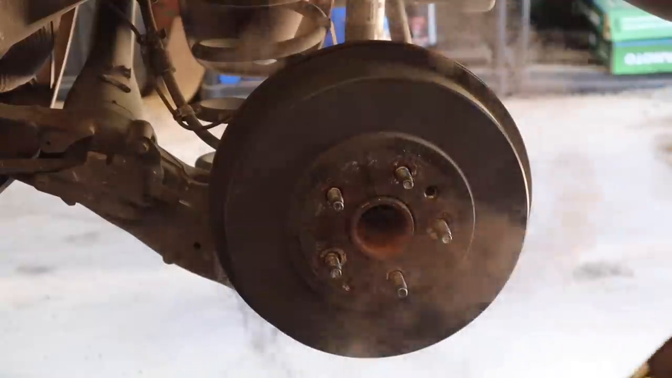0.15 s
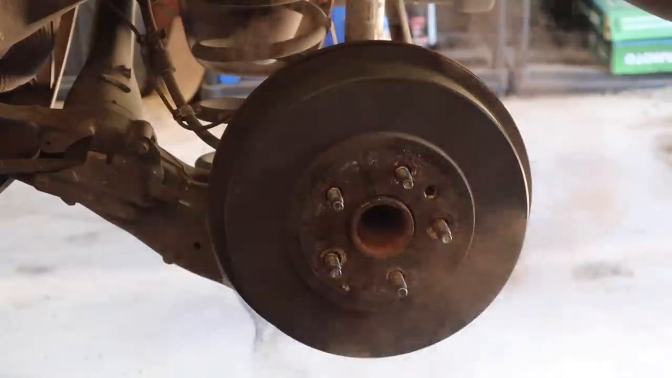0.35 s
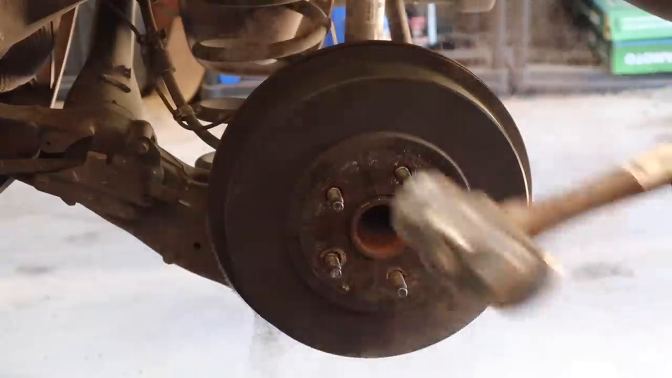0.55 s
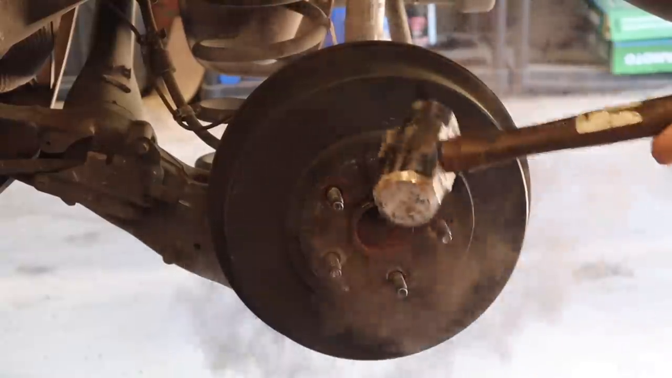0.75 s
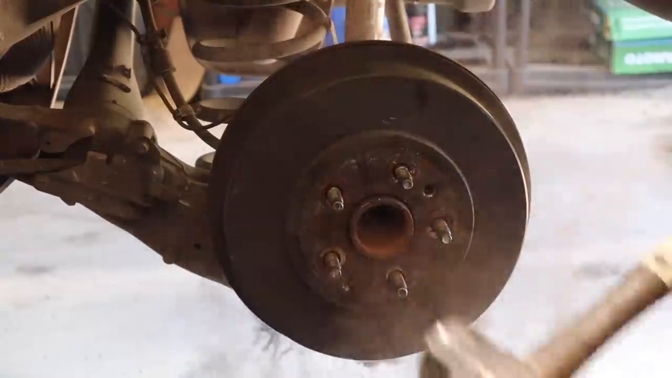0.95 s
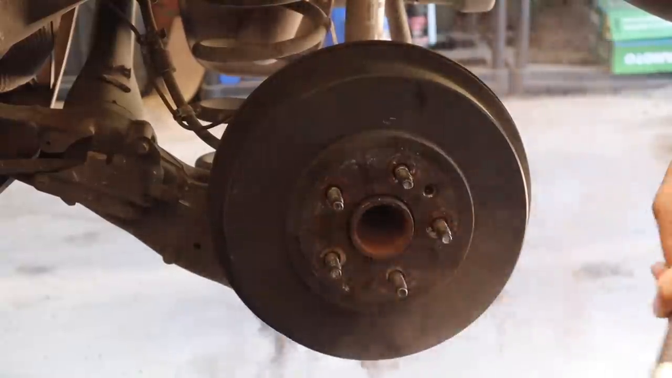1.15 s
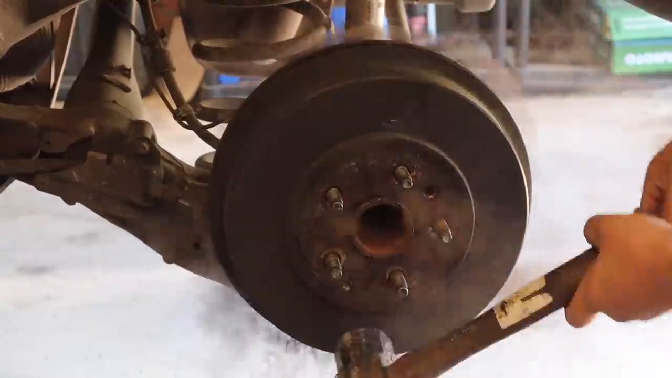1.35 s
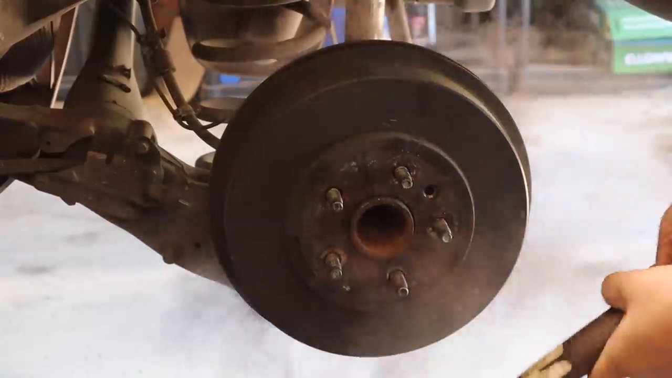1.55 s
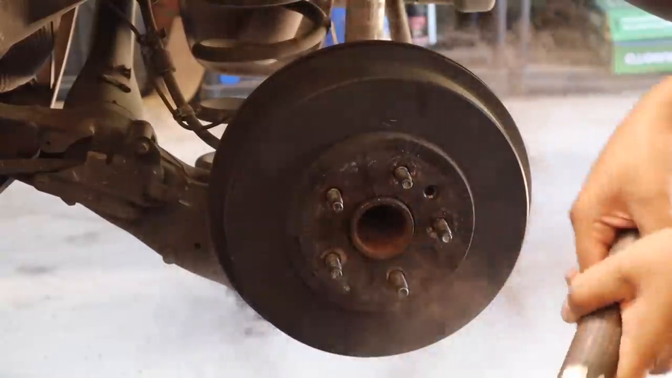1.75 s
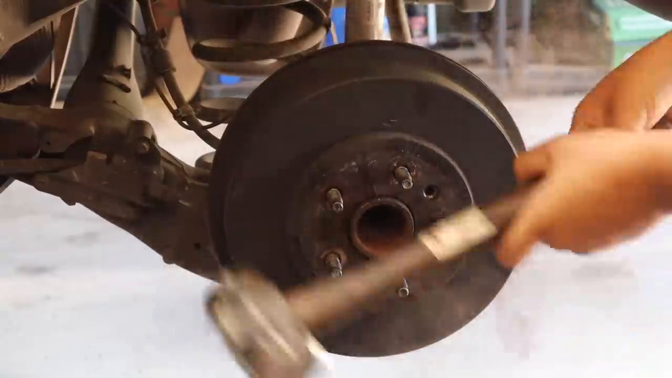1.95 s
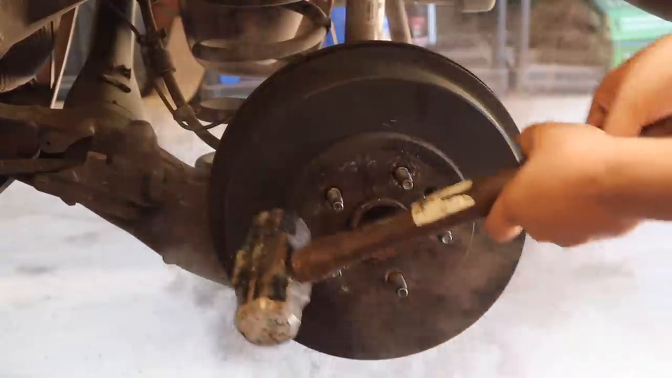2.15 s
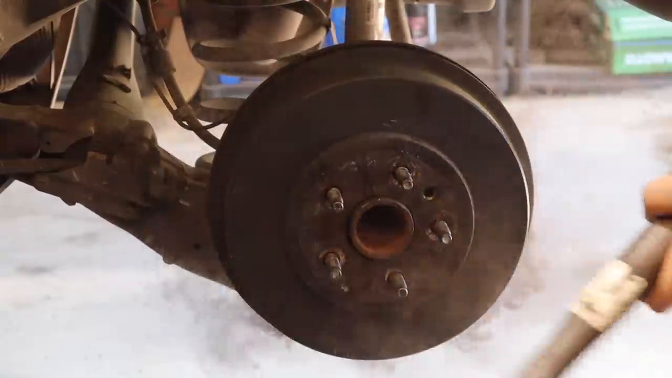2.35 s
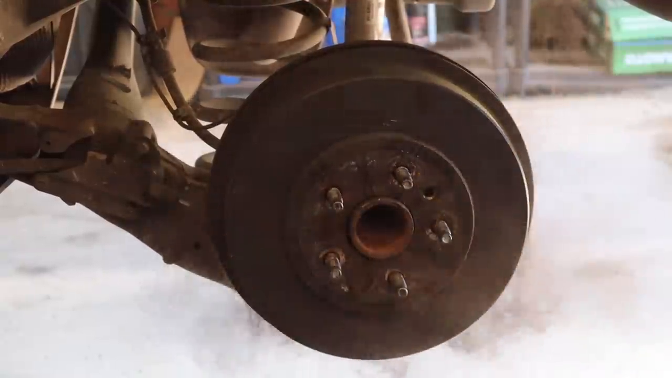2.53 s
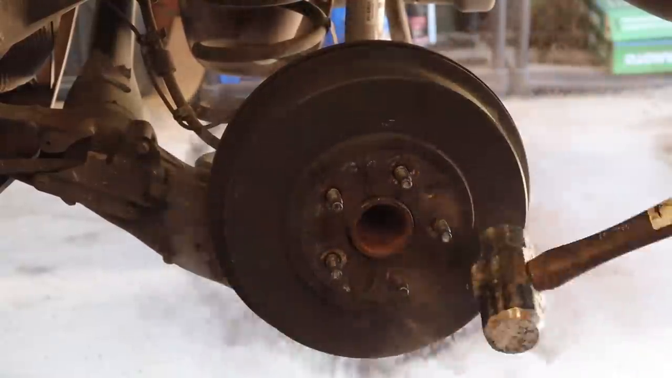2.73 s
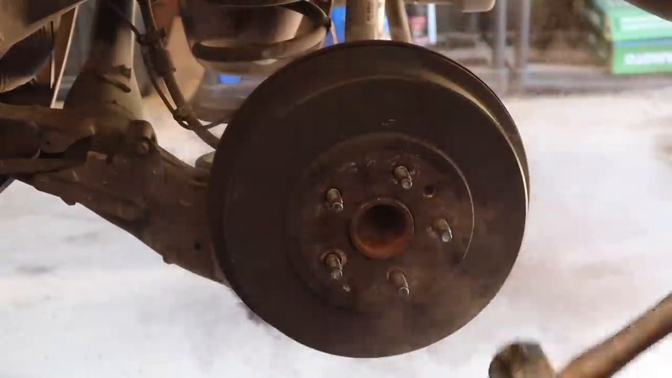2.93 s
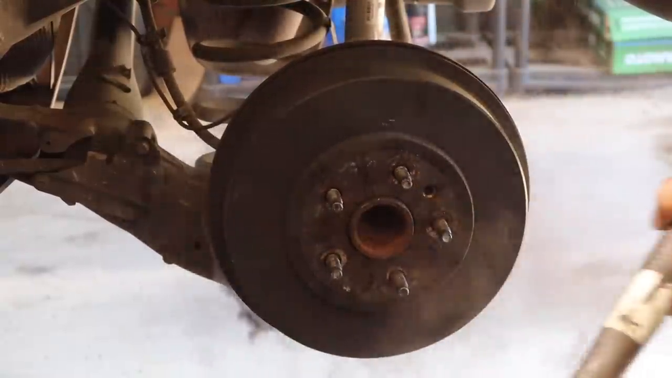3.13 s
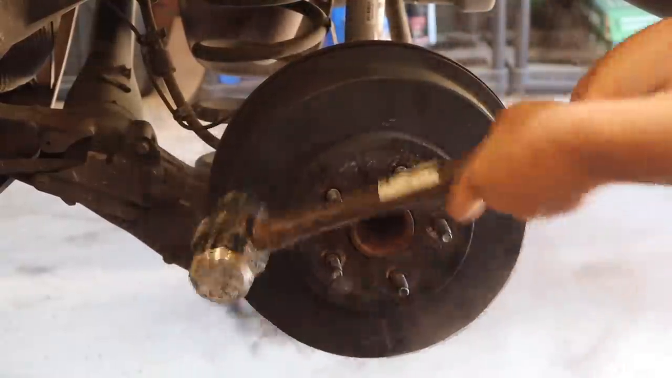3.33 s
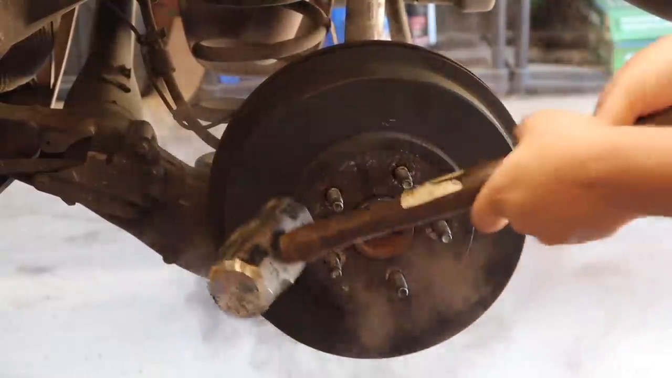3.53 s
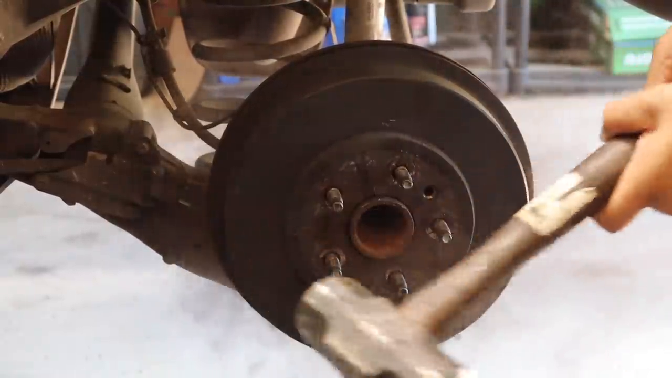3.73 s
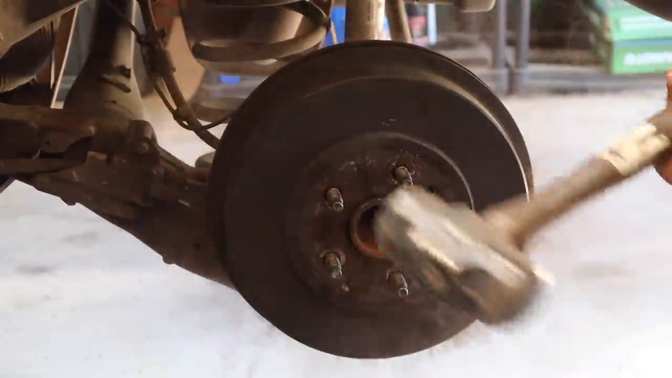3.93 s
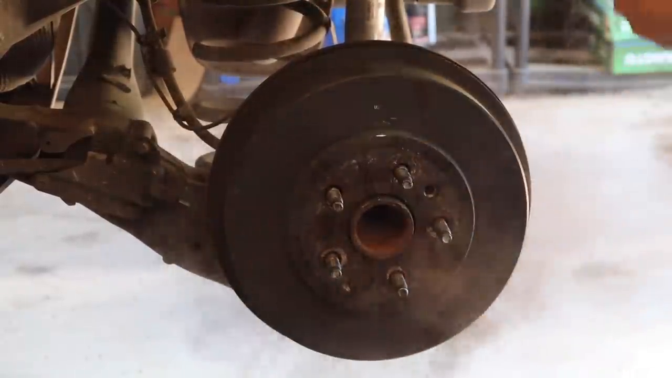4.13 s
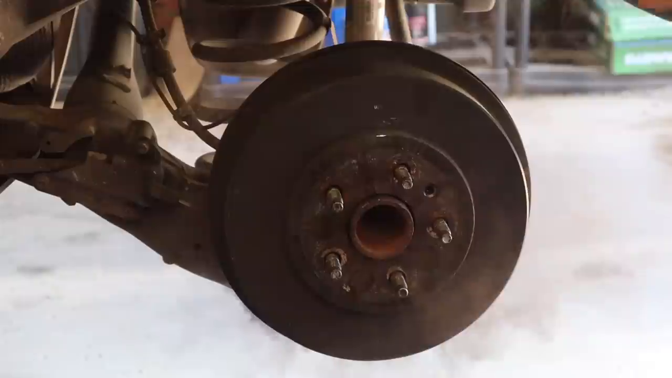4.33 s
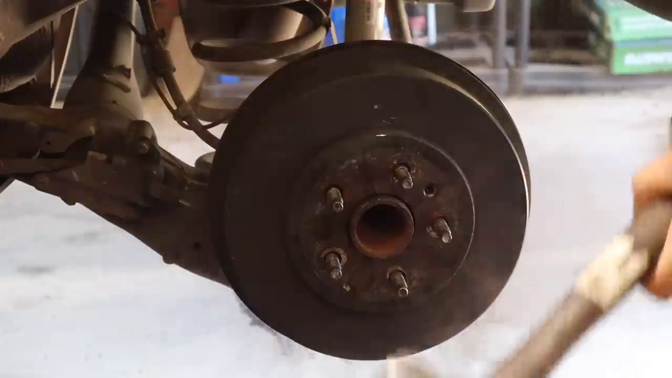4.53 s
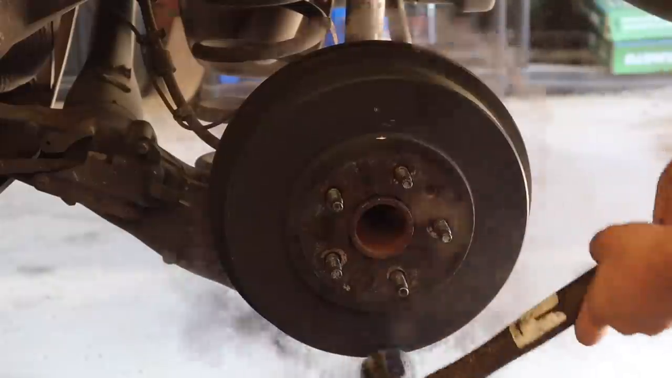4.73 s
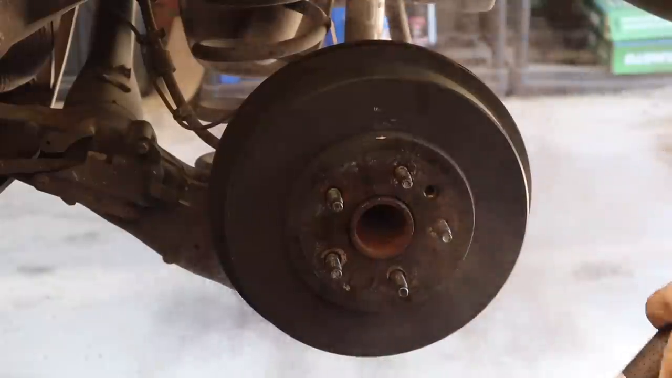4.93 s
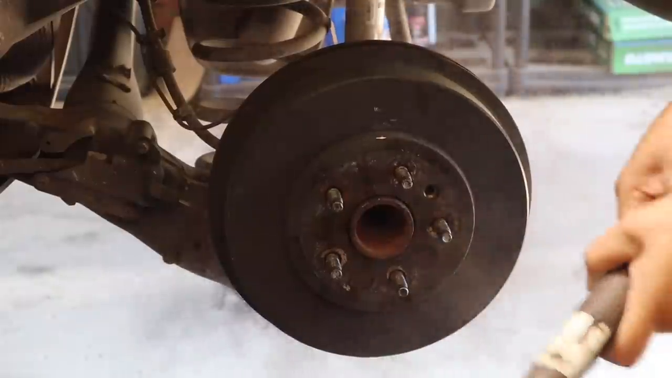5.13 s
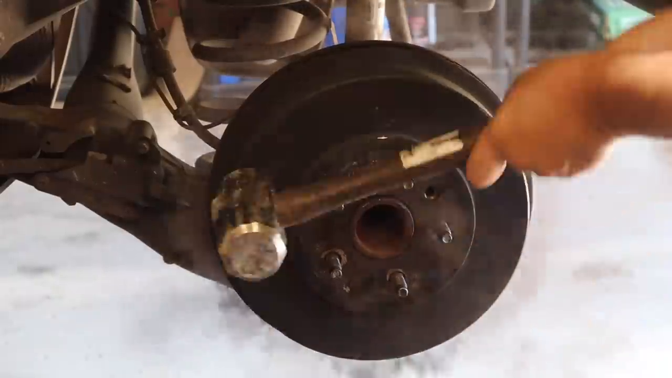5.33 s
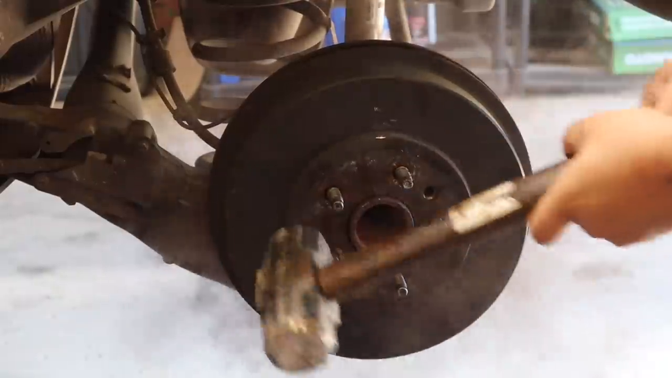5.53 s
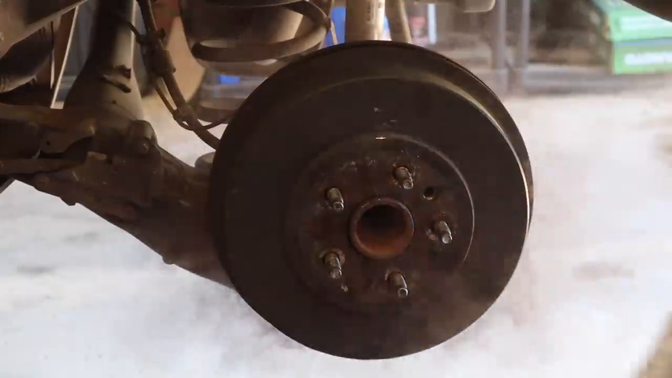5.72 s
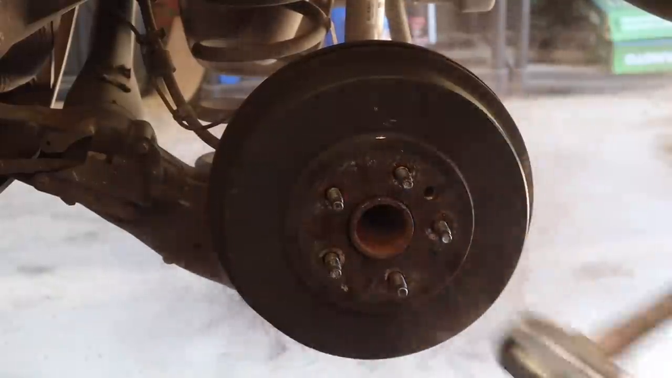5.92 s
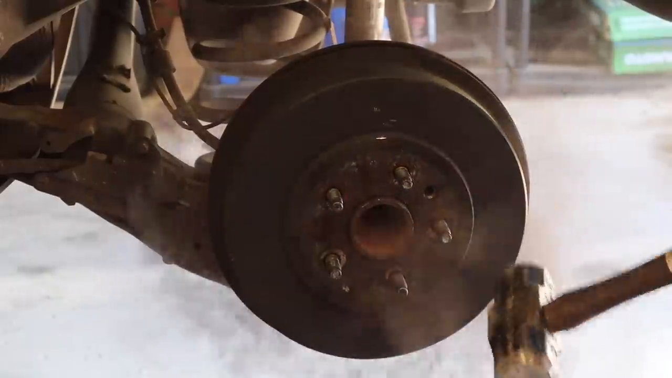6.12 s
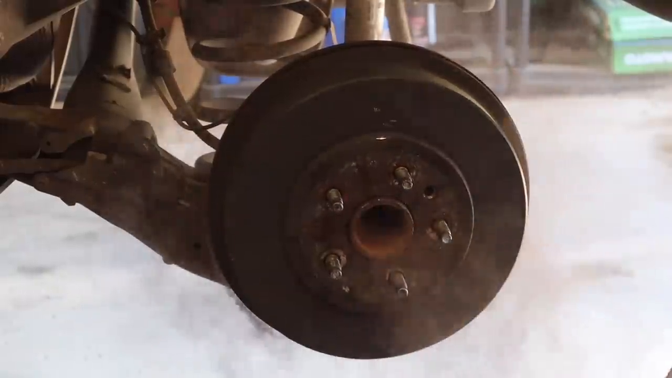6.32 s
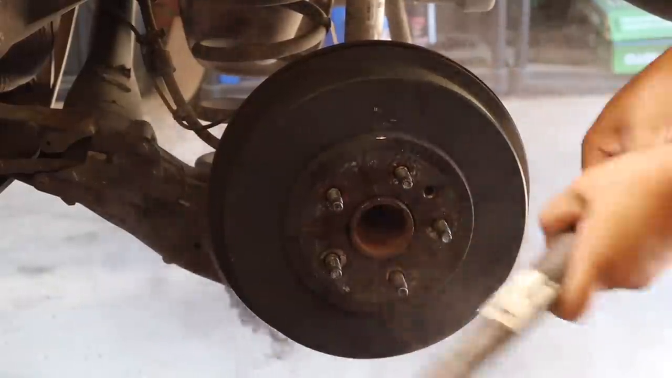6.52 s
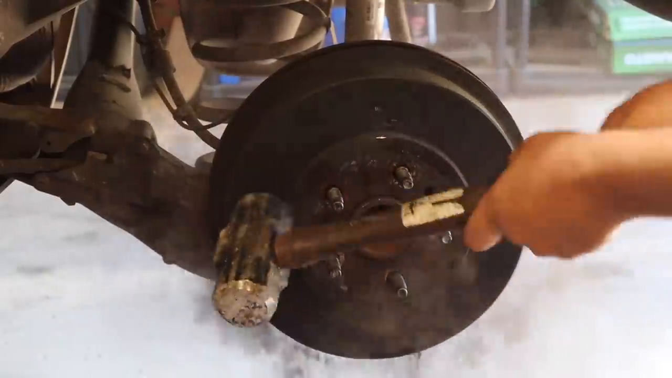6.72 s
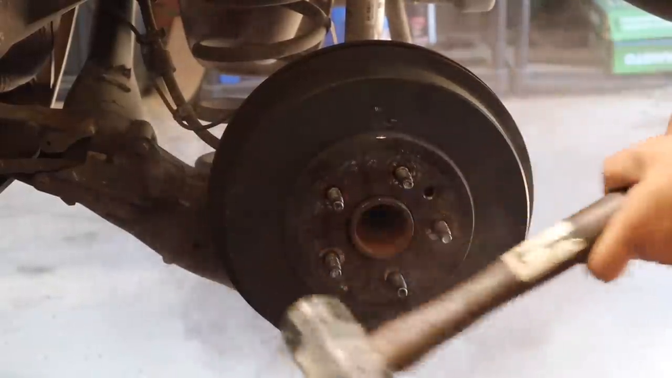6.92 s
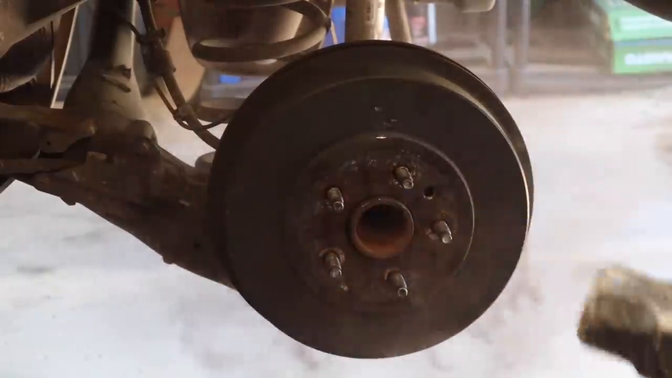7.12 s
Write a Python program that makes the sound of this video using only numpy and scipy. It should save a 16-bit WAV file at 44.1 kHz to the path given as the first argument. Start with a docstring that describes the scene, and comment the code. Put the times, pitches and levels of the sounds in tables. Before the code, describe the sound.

A sledgehammer hits a stuck cast-iron brake drum, very close, in a reverberant garage. The sound opens right on a blow at 0 s, somewhat softer and duller with a deep suspension thump; a brighter, also thumping one follows at 0.7. Further blows land at 1.4, 2.1, 2.8 (the strongest, with less bass and a tiny low puff of air just before), 3.4, 4.1 (duller), 4.8, 5.4, 6.1 and 6.7 s. Each is an abrupt, overloaded crack, a dense clank around 2-4 kHz that dies within 0.2 s, and loose brake parts chattering, then a room tail that darkens over about 0.7 s. Quiet low air and a faint drone continue throughout; a faint hum swells from 1.5 to 4 s, slowly sinking in pitch. Soft clothing and shoe shuffles pass near 4.5, 5.9, 6.6 and 7.2 s, as the last echo fades.

```python
"""A sledgehammer strikes a stuck brake drum on a car's axle eleven times, close to the microphone in a garage.
Each blow sums decaying cast-iron modes with a filtered push and chatter of the shoes and backing plate;
the spot hit on the rim and the thump of the suspension colour it, and a noise-built room prolongs it.
Between blows clothes and shoes shuffle, and one swing puffs air at the microphone, all shaped noise.
Behind lie soft air, a steady drone and a swelling, sinking hum; the overloaded microphone flattens attacks."""
import sys
import numpy as np
from scipy import signal
from scipy.fft import rfft, irfft, next_fast_len
from scipy.io import wavfile

SR = 44100
rng = np.random.default_rng(int(sys.argv[2]) if len(sys.argv) > 2 else 0)


def unload_wav(signal):
    """Save mono or channel-first audio to the path in sys.argv[1] as 16-bit WAV at rate SR, clipped to [-1, 1]."""
    wavfile.write(
        sys.argv[1],
        SR,
        np.round(np.clip(np.atleast_2d(signal).T, -1, 1) * 32767).astype(np.int16),
    )


N = 320607
RING_SIZE = 48000  # samples in which a blow and its room response ring out
AGE = np.arange(RING_SIZE) / SR  # seconds since the blow
TOP_HZ = 16000  # upper limit of the microphone


def undb(db):
    """Decibels to gain."""
    return 10 ** (np.asarray(db) / 20)


def unit(x):
    """Scale to an energy of one."""
    return x / np.sqrt(np.sum(x ** 2))


def fade(t60):
    """Exponential decay that loses 60 dB in t60 seconds."""
    return np.exp(-np.log(1000) * AGE / t60)


def along(hz, points):
    """Read (Hz, value) points on a log-frequency axis."""
    f, value = np.transpose(points)
    return np.interp(np.log(np.maximum(hz, 1)), np.log(f), value)


def colour(x, points):
    """Causal minimum-phase filter with the gain of (Hz, dB) points, built from the cepstrum."""
    size = 2 * next_fast_len(len(x))
    gain = undb(along(np.fft.rfftfreq(size, 1 / SR), points))
    cepstrum = irfft(np.log(gain))
    # fold the cepstrum onto positive times, so that nothing sounds early
    cepstrum[1:size // 2] *= 2
    cepstrum[size // 2 + 1:] = 0
    response = np.exp(rfft(cepstrum))
    return irfft(rfft(x, size) * response)[:len(x)]


def hammering(level_db=27):
    """Every blow sounds drum and loose parts from its spot on the rim and fills the garage."""
    # hammer blows: t/s, spot on the rim/clock hours, force/dB before level_db,
    # brightness/dB per octave, suspension thump/dB
    blows = [ (-.006, 5.14, -5.5, -2, 10), (0.7157, 12.3, -2, 1, 9), (1.3939, 5.96, 0.04, 0, -1.5),
             (2.0926, 9.3, 1.2, 0.5, 0.7), (2.7690, 3.86, 3, -0.9, -6.5), (3.437, 9.1, 0.25, -2, -1.5),
             (4.1040, 14, -0.3, -3, -1.3), (4.773, 5, 0.34, 0.5, -.7), (5.4126, 9.3, 1.9, -0.5, -0.5),
             (6.0709, 3.74, 1.95, -0.45, .6), (6.7087, 8.26, 1.03, 0, 0.3)]
    # the iron rings cleanest, and the loose parts rattle least, near the top of the rim
    clean_spot, clean_swing_db = 2, 0.5  # clock hours, dB
    out = np.zeros(N + 2 * RING_SIZE)  # room for a blow that begins before the start
    for s, spot, force_db, brightness, thump_db in blows:
        clean = undb(clean_swing_db * facing(spot, clean_spot))
        struck = drum() * clean + rattle() / clean
        blow = colour(struck, contact(spot, brightness, thump_db))
        in_room = signal.fftconvolve(blow, garage())[:RING_SIZE]
        start = RING_SIZE + int(s * SR)
        out[start:start + RING_SIZE] += undb(level_db + force_db) * in_room
    return out[RING_SIZE:RING_SIZE + N]


def contact(spot, brightness, thump_db):
    """(Hz, dB) colour of one blow, from where it lands, how squarely, and how much it shakes the suspension."""
    # each part answers to its own spots, once or twice round the rim; a negative swing answers least there:
    # f/Hz, best spot/clock hours, lobes round the rim, swing/dB
    parts = [ (90, 1, 1, 1.1), (200, 5.0, 1, 3), (527, 2, 1, 1.3), (1510, 7.26, 1, 5.5),
             (2100, 1.1, 1, 1.2), (2900, 1.4, 1, 1.5), (3750, 10, 1, 2), (4230, 3, 2, 2),
             (6130, 7.95, 1, 3), (8200, 4.9, 1, -0.5)]
    # a square, hard contact tilts the treble up across this range: from f/Hz, to f/Hz
    bright_hz = (2300, 6960)
    thump_hz = 400  # the thump has fallen to half its dB here
    hz = np.geomspace(30, TOP_HZ, 200)
    part_hz, best_spot, lobes, swing_db = np.transpose(parts)
    place = along(hz, np.c_[part_hz, swing_db * facing(spot, best_spot, lobes)])
    tilt = brightness * np.log2(np.clip(hz, *bright_hz) / bright_hz[0])
    thump = thump_db / (1 + (hz / thump_hz) ** 2)
    return np.c_[hz, place + tilt + thump]


def facing(spot, best_spot, lobes=1):
    """1 for a blow on a best spot of the rim, -1 for one midway between best spots."""
    return np.cos(2 * np.pi * lobes * (spot - best_spot) / 12)


def drum(scatter_db=-0.7, drum_db=-1.5):
    """Cast-iron modes; the drum is not quite round, so each is a close pair that beats."""
    # modes of the drum on its axle: f/Hz at the middle of the pair,
    # energy/dB before scatter and drum_db, t60/s
    modes = [ (70, -23, .25), (192, -20, .08), (345, -20, .06), (482, -23, .1), (561, -24, .1),
             (646, -23, .12), (1141, -25, .08), (1435, -21, .06), (1530, -19, .05), (1622, -17, .05),
             (1700, -17, .04), (1775, -16, .04), (2092, -12, .12), (2150, -16, .03), (2880, -11.5, .11),
             (3020, -13, .02), (3745, -11.5, .16), (3850, -15, .03), (4235, -12, .03), (4303, -11.5, .1),
             (5090, -21, .02), (5467, -24, .12), (5590, -22, .03), (6110, -16, .025), (6180, -16, .08),
             (6850, -25, .03), (7362, -29, .1), (8235, -22, .05)]
    split = .004  # each of the pair lies this share of the pitch off the middle
    chance = rng.standard_normal((len(modes), 3))
    rings = 0
    for (hz, db, t60), (size, *sides) in zip(modes, chance):
        pair = 0
        for side, ratio in zip(sides, [1 - split, 1 + split]):
            # either polarity, by chance
            pair = pair + np.sign(side) * np.sin(2 * np.pi * hz * ratio * AGE)
        rings = rings + undb(db + scatter_db * size) * unit(pair * fade(t60))
    return undb(drum_db) * rings


def rattle(chatter_t60=0.18, chatter_db=-10):
    """One hard push of steel on iron, with the loose parts behind the drum chattering as decaying noise."""
    # dense response of shoes, springs and backing plate: f/Hz, relative level/dB
    loose_parts = [(25, -33), (55, -13.5), (130, -4), (350, 0.5), (850, -1), (1150, -5.5), (1650, -2.5),
                   (2200, -1.5), (2600, -6.5), (3600, -5), (4800, -9.5), (7000, -14), (10000, -17.5),
                   (16000, -24.5)]
    push = undb(chatter_db) * unit(rng.standard_normal(RING_SIZE) * fade(chatter_t60))
    push[0] += 1
    return unit(colour(push, loose_parts))


def garage(direct_db=3, near_db=7, near_t60=.045, walls_db=-1.82):
    """Room response: direct sound, quick echoes from floor and wheel arch, and a tail that grows dull."""
    # reverberation off the hard walls: f/Hz, t60/s
    reverb = [(60, 0.65), (250, 0.65), (800, 0.76), (2000, 0.74), (4000, 0.67), (6000, 0.59), (9000, 0.42),
              (15000, 0.27)]
    hz = np.fft.rfftfreq(RING_SIZE, 1 / SR)
    noise = rfft(rng.standard_normal(RING_SIZE))
    centres, t60s = np.transpose(reverb)
    tail = 0
    # overlapping bands, each with its own decay
    for share, t60 in zip(np.eye(len(reverb)), t60s):
        band = irfft(noise * along(hz, np.c_[centres, share]))
        tail = tail + band * fade(t60)
    near = rng.standard_normal(RING_SIZE) * fade(near_t60)
    response = undb(walls_db) * unit(tail) + undb(near_db) * unit(near)
    response[0] += undb(direct_db)
    return response


def movement():
    """The worker shuffles between blows, and one swing buffets the microphone with a low puff; both are noise."""
    # shifts of stance: t/s, level/dB, length/s
    shifts = [(4.53, -42, 0.19), (5.9, -47.5, 0.32), (6.57, -42.5, 0.18), (7.2, -46.5, 0.23)]
    # soft shuffle of clothes and shoes: f/Hz, relative level/dB
    shuffle = [(60, -17.5), (170, -6), (290, 2), (430, -10), (650, -20.5), (2000, -28.5), (12000, -38.5)]
    # a swing pushes air against the microphone: t/s, level/dB, length/s
    puff = (2.757, -34.5, .012)
    shifting = sum(undb(db) * swell(s, length) for s, db, length in shifts)
    s, db, length = puff
    puff_noise = wash([(40, -7), (110, 1), (500, -6.0), (3000, -53.0)])
    return shifting * wash(shuffle) + undb(db) * swell(s, length) * puff_noise


def swell(s, length):
    """A bell-shaped rise and fall of gain, greatest at time s; length is its standard deviation."""
    return np.exp(-((np.arange(N) / SR - s) / length) ** 2 / 2)


def background(air_db=-49):
    """Soft workshop air, a faint drone, and a low hum that swells for a while as it sinks in pitch."""
    # background air: f/Hz, relative level/dB per Hz
    air = [(25, -7), (80, 0), (160, -4), (350, -10), (800, -12), (1600, -21), (3200, -33), (7000, -48),
           (15000, -66)]
    # low hum: f/Hz as it starts to swell, level/dB at full swell
    partials = [(81.8, -43), (122, -51), (163.6, -54)]
    # faint steady drone: f/Hz, level/dB
    drone = (181, -56)
    # the hum rises once out of a faint level, holds and dies back
    start_s, rise_s, hold_s, fall_s, faint_db = 1.5, 0.44, 1.55, 0.51, -14.5
    sink_per_s = 0.024  # share of its starting pitch lost each second
    since = np.arange(N) / SR - start_s
    hum = sum(tone(hz * (1 - sink_per_s * since), db) for hz, db in partials)
    turns = np.cumsum([0, rise_s, hold_s, fall_s])
    hum_db = np.interp(since, turns, [faint_db, 0, 0, faint_db])
    return undb(air_db) * wash(air) + tone(*drone) + undb(hum_db) * hum


def wash(points):
    """Noise of rms one with the spectrum of (Hz, dB) points."""
    noise = colour(rng.standard_normal(N), points)
    return noise / noise.std()


def tone(hz, db):
    """A sine with an rms level of db; hz is steady or given for every sample."""
    cycles = np.cumsum(hz * np.ones(N)) / SR + rng.random()
    return np.sqrt(2) * undb(db) * np.sin(2 * np.pi * cycles)


def scene():
    """The hammering close by, the worker's movement and the quiet garage behind."""
    return (hammering() + movement() + background())[None]


def record(dry):
    """The overloaded microphone flattens loud attacks; the deepest bass and the top are cut."""
    knee, ceiling, bass_hz = 7, .95, 28  # a higher knee bends more sharply; ceiling in full scale
    clipped = dry / (1 + np.abs(dry / ceiling) ** knee) ** (1 / knee)
    high_pass = signal.butter(2, bass_hz, "high", fs=SR, output="sos")
    clipped = signal.sosfilt(high_pass, clipped)
    low_pass = signal.firwin(301, TOP_HZ, fs=SR)
    return signal.fftconvolve(clipped, low_pass[None], mode="same")


dry = scene()
out = record(dry)
unload_wav(out)
```